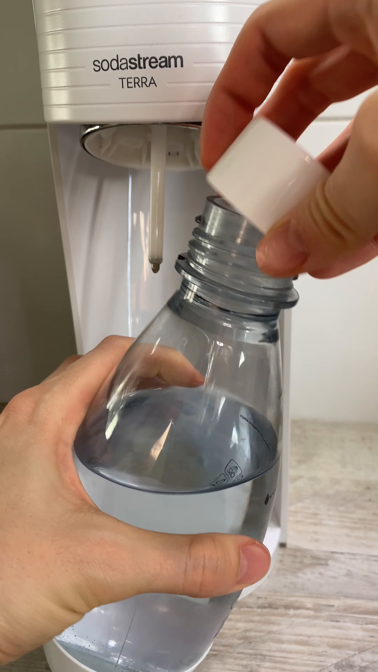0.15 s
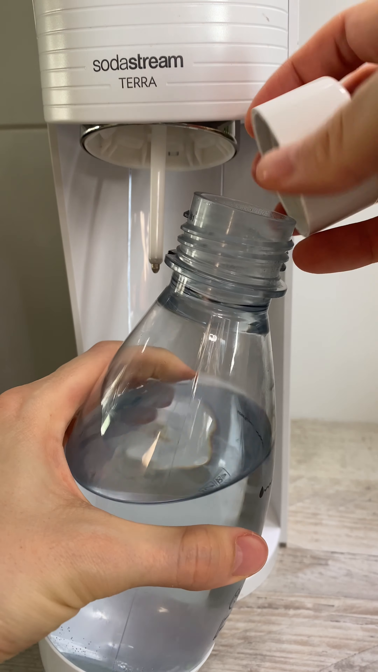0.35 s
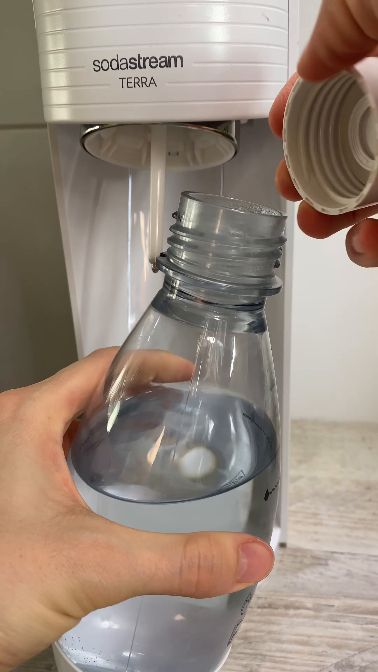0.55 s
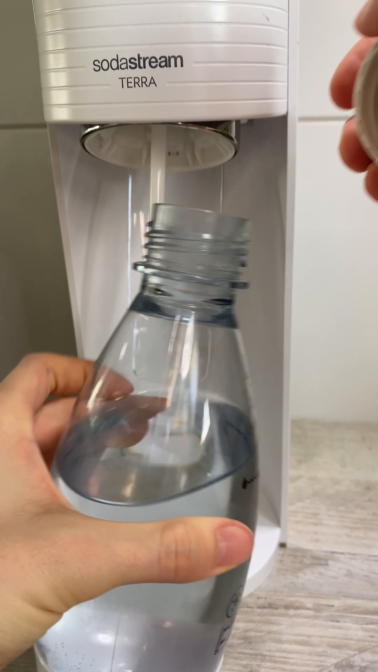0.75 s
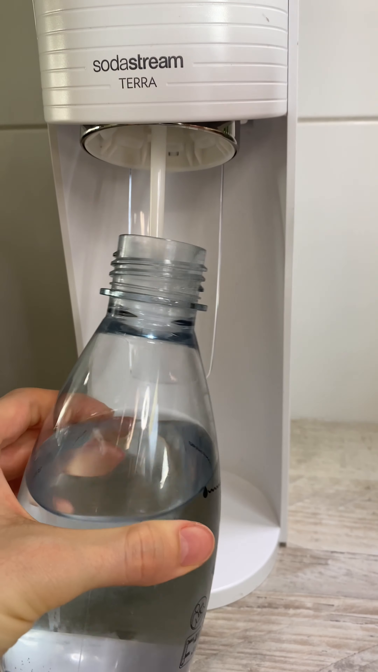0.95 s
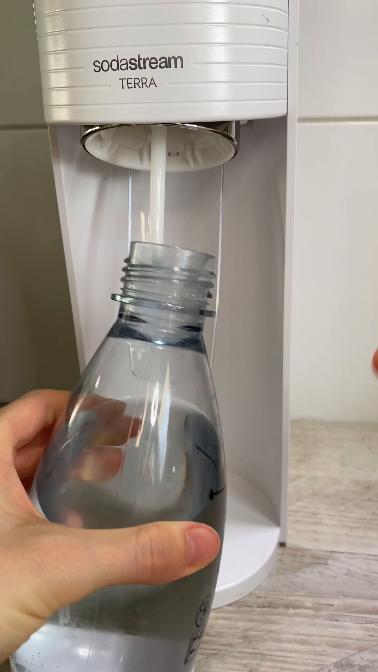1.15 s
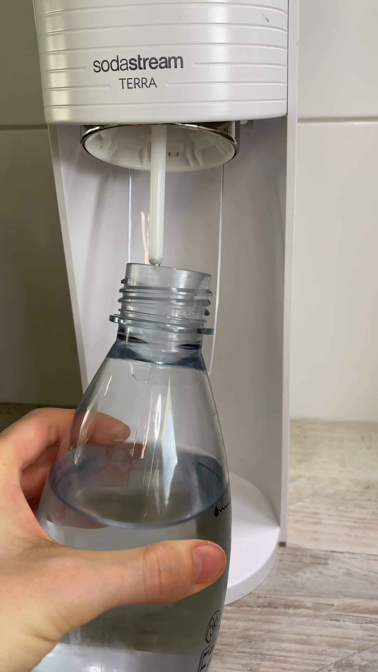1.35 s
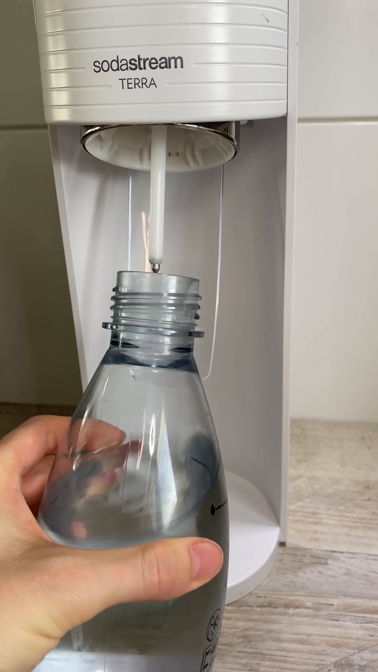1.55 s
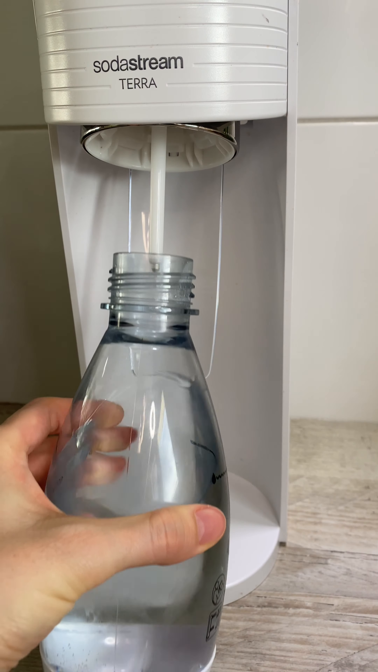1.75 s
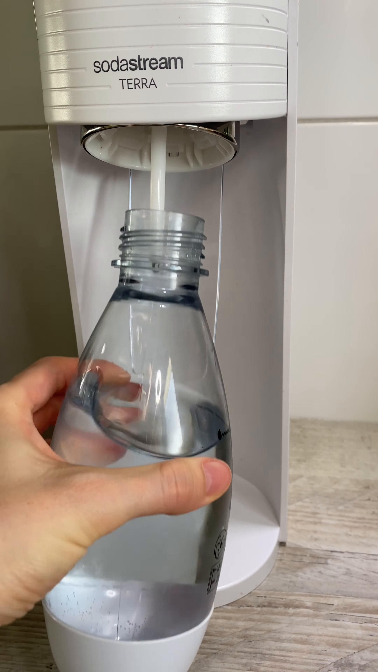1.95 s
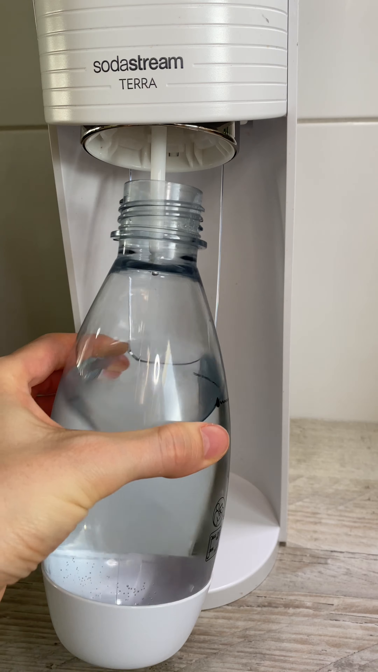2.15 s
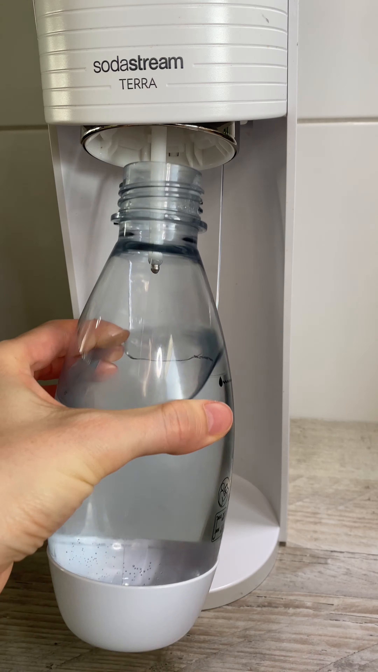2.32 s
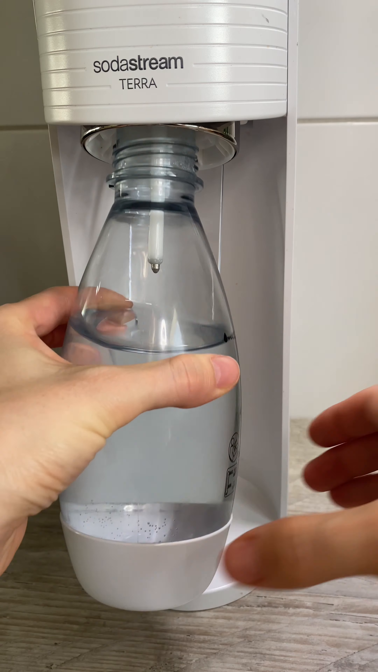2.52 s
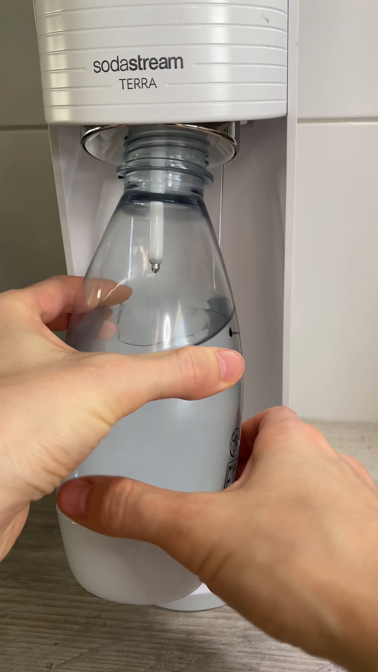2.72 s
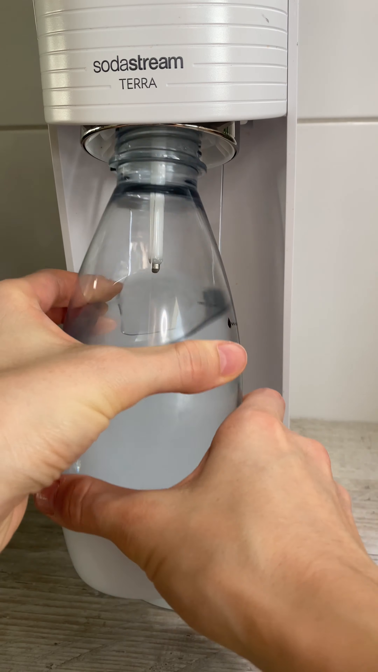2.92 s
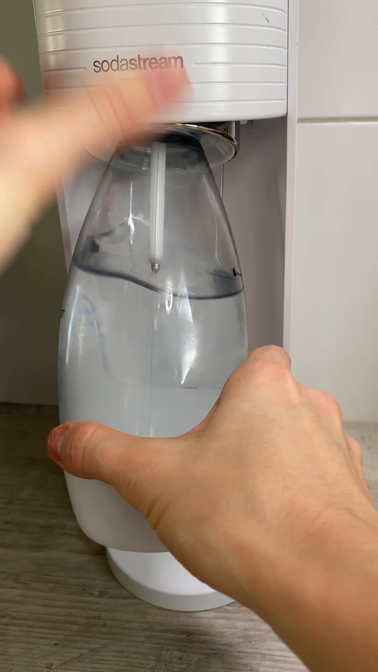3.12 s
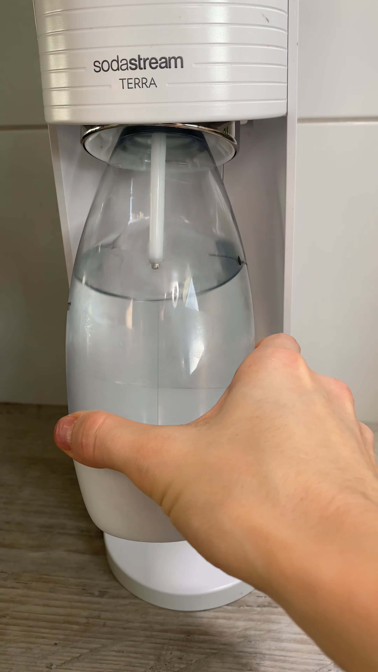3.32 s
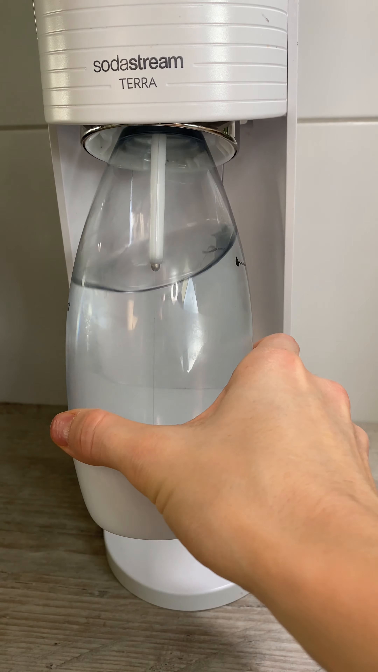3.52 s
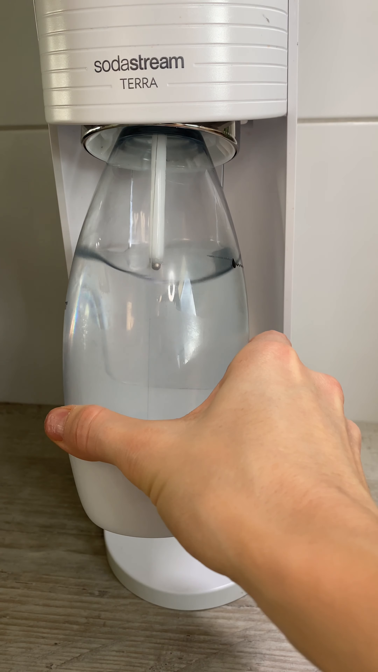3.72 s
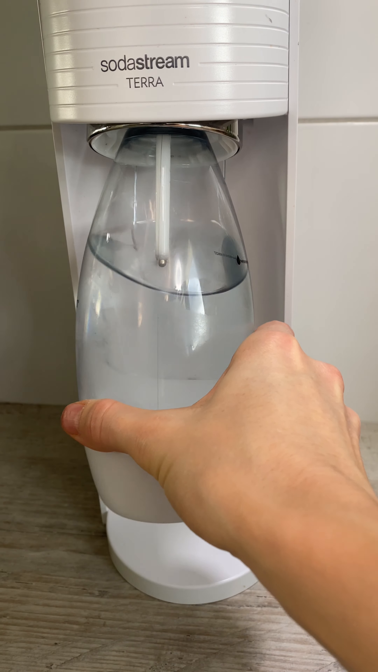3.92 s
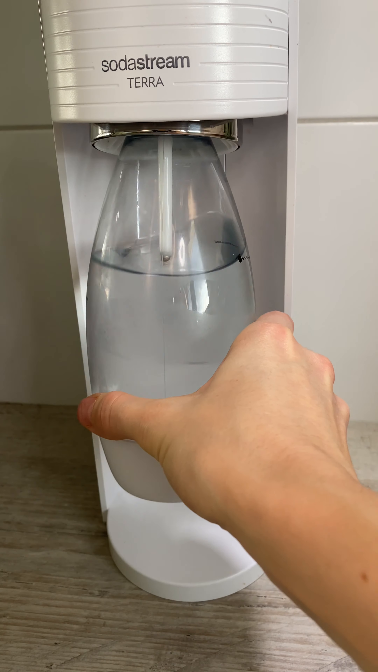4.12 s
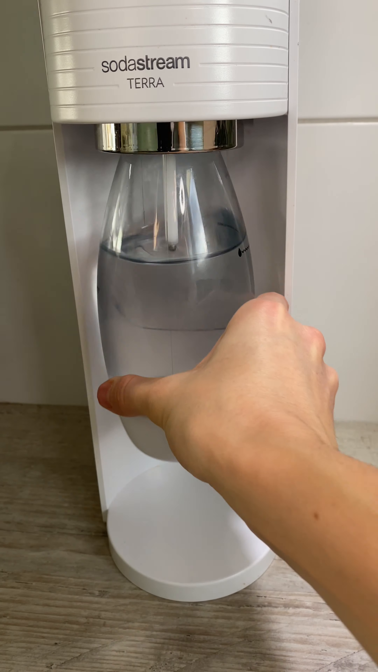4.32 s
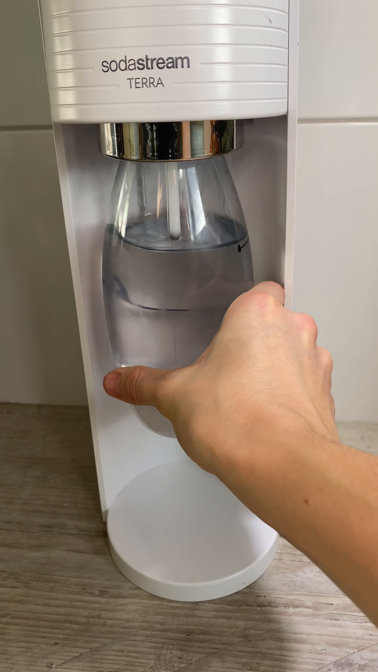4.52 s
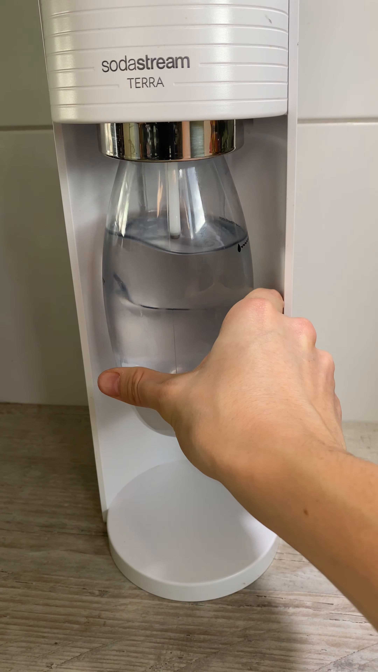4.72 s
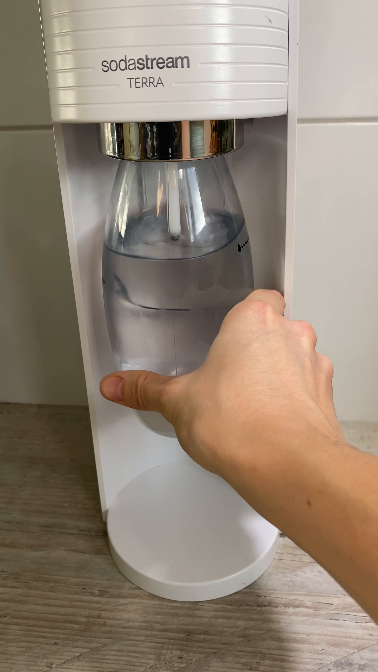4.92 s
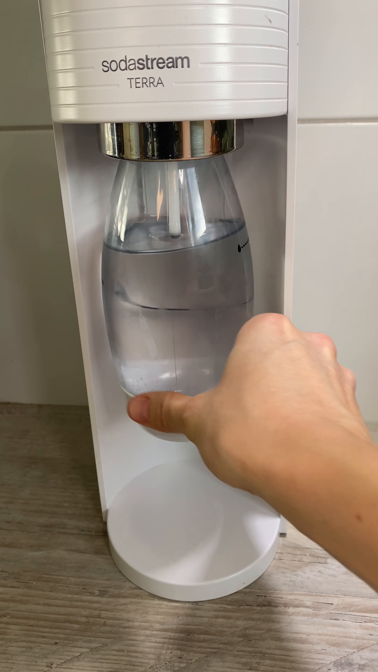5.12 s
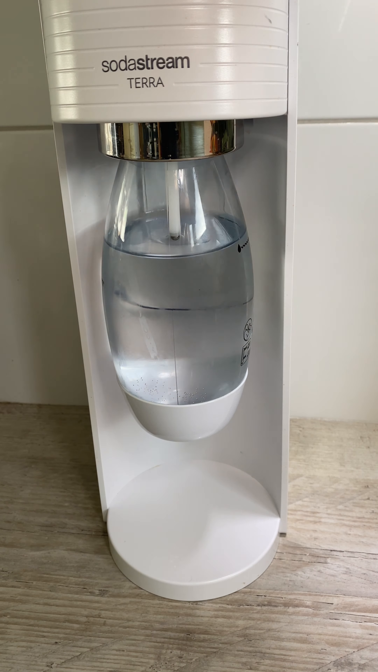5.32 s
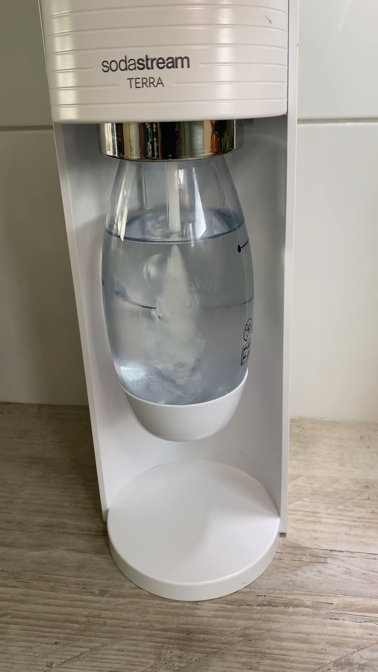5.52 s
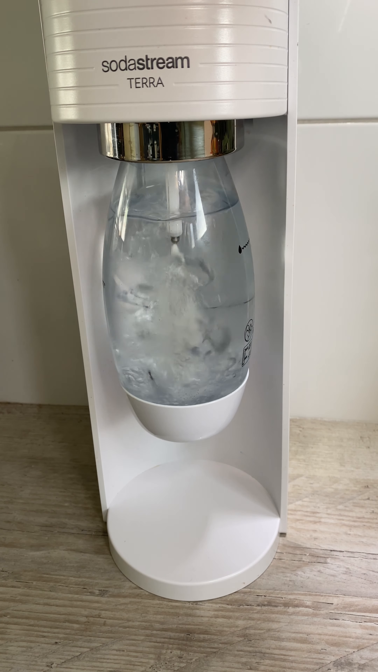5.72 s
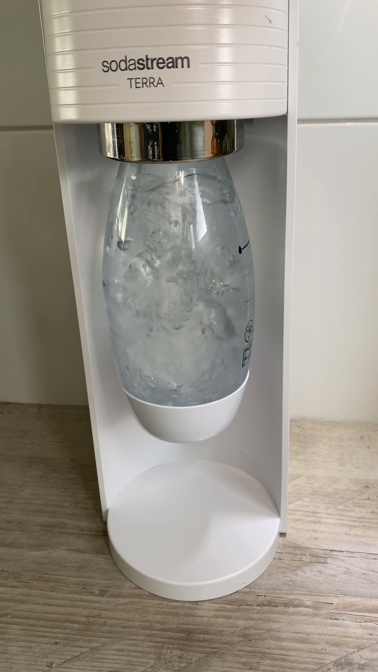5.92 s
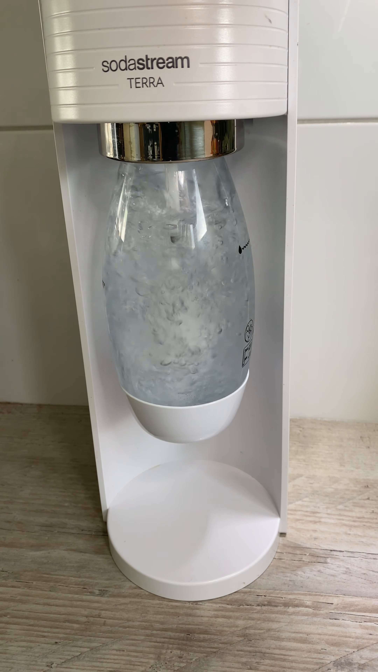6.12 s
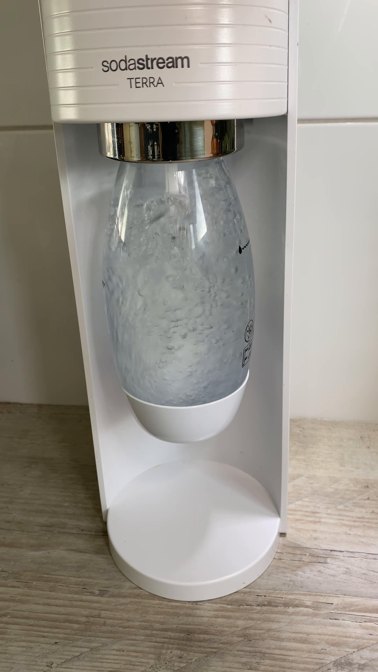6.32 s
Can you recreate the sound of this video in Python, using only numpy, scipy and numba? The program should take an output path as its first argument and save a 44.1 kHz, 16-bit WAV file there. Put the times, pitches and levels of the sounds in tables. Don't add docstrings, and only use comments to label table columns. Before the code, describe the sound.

Close kitchen handling of a plastic water bottle, with faint taps, hard knocks and clicks, ending in a sudden bubbling, hissing gas jet.

```python
import sys
import numpy as np
from scipy import signal
from scipy.fft import rfft, irfft, next_fast_len
from scipy.io import wavfile
from scipy.ndimage import uniform_filter1d
from numba import njit

SR = 44100
rng = np.random.default_rng(int(sys.argv[2]) if len(sys.argv) > 2 else 0)


def to_wav(s):
    ch = np.atleast_2d(s).T
    pcm = np.round(np.clip(ch, -1, 1) * 32767)
    wavfile.write(sys.argv[1], SR, pcm.astype(np.int16))


def invert_db(level):
    return 10 ** (np.asarray(level, dtype=float) / 20)


N = 280476

# (frequency [Hz], density [dB per Hz])
HUM = [(20, -7.5), (45, -2.5), (80, 4), (140, -4), (256, -2.5), (400, -20), (540, -43), (1200, -72.5)]
# (frequency [Hz], density [dB per Hz])
HISS = [(500, 5), (1500, -8.5), (4000, -7.5), (7000, -9.5), (9500, -38), (13500, 1), (14500, -30)]
# (frequency [Hz], width [Hz], level [dB])
WHINE = [(9790, 90, 0), (10630, 90, -3), (10980, 90, -5), (13200, 90, 1), (13738, 60, 4)]
STIR_DB, STIR_RISE_S, STIR_FADE_S = -66, 0.12, 0.077
HAND_STIR_DB, HAND_STIR_SHARE = -29, 0.42

# (start [s], hold [s], level [dB], body rumble over it [dB])
RUBS = [(1.03, 0.031, -72.5, 14.5), (1.173, 0.14, -70.5, 5.5), (5.357, 0.056, -75.5, 8),
        (3.556, 0.05, -70.5, 5), (1.073, 0.093, -75, 2.5), (1.49, 0.01, -70.5, -1), (2.438, 0.077, -88, 26),
        (3.507, 0.049, -86.5, 14), (3.679, 0.24, -67.5, 12), (3.841, 0.13, -59.5, 8), (3.988, 0.17, -69, 8),
        (5.303, 0.079, -94.5, 28.5), (2.035, 0.096, -57, 5.5), (2.982, 0.087, -56, -1),
        (3.269, 0.063, -64, 15.5), (4.204, 0.057, -68.5, 19.5), (4.332, 0.13, -62, -5.5),
        (4.574, 0.058, -81, 15), (4.963, 0.035, -69, 8), (4.994, 0.062, -69.5, 15)]
# (start [s], hold [s], level [dB])
CAP_TURN = (0.0, 0.29, -69.5)
# (frequency [Hz], width [Hz], level [dB])
THREAD = [(834, 100, -39), (1870, 300, 0.5), (2610, 220, 2), (3180, 660, -7), (4370, 260, -5),
          (5840, 300, -6)]
# (frequency [Hz], width [Hz], level [dB])
GRIP = [(280, 120, 0), (480, 200, -2), (800, 400, -4)]
# (frequency [Hz], level [dB])
RUSTLE = [(10500, -40), (12300, 0), (15500, 0), (16500, -25)]
RUB_RISE_DB_S, RUB_FADE_DB_S = 607.5, 316

# (time [s], peak [dB], pitch [Hz])
THUDS = [(1.189, -55.5, 234.5), (1.279, -59, 275), (4.08, -45.5, 94.1), (1.521, -54.5, 166.4),
         (1.569, -57, 165.4), (2.468, -42, 223.6), (2.518, -55.5, 218.2), (2.966, -12, 320.4),
         (3.021, -35, 181), (3.261, -10, 308.2), (3.31, -24, 153), (3.565, -32.5, 282),
         (3.776, -30.5, 294.4), (3.878, -33.5, 500), (3.919, -38.5, 487), (3.984, -36, 265.6),
         (4.025, -39, 326), (4.29, -21.5, 250.7), (4.307, -9, 365), (4.334, -22, 280.6), (4.363, -44, 235),
         (4.451, -35.5, 244), (4.553, -41.5, 246), (4.986, -34.5, 328), (5.283, -57, 267),
         (5.436, -34.5, 295.6), (5.473, -24.5, 276.4)]
# (time [s], peak [dB], pitch [Hz], ring [s])
SWELLS = [
    (3.552, -17.5, 276.3, 0.091),
    (5.47, -22, 269.2, 0.26),
    (5.69, -32.5, 115.6, 0.28),
    (5.74, -27, 77, 0.27),
    (5.83, -27, 70, 0.16),
    (5.92, -22.5, 87.5, .3),
    (5.97, -18, 92.1, 0.17),
    (6.09, -28, 85.8, 0.22),
]
# (time [s], peak [dB], pitch [Hz], ring [s])
SQUEAK = (0.14, -43, 400, .28)
HARD_RING_S, RING_DOUBLES_DB = 0.028, 20
SWELL_RISE_S, SWELL_GLIDE = 0.043, .2
SQUEAK_RISE_S, SQUEAK_GLIDE = .08, .45

# (time [s], crack peak [dB], crack pitch [Hz], shell ring [dB], shell pitch [Hz])
CAP = [
    (0.0199, -52, 2342, -54.5, 834),
    (0.0567, -52, 4370, -91, 850),
    (0.1002, -54, 2700, -57, 834),
    (0.1696, -58, 2500, -59, 834),
    (0.2154, -56, 2560, -54, 830),
    (0.2483, -54, 2600, -48, 834),
    (0.4615, -62.5, 4100, -86, 1240),
    (0.6737, -64, 4370, -94, 630),
    (1.3683, -52, 4350, -84, 640),
    (1.497, -59, 1676, -53, 992),
]
# (time [s], crack peak [dB], crack pitch [Hz], shell ring [dB], shell pitch [Hz])
TAPS = [
    (1.0137, -40, 2300, -47, 680),
    (1.1857, -32.5, 2830, -36, 1018),
    (1.19, -58, 3000, -43, 693),
    (1.2352, -68, 2690, -36.5, 998),
    (1.276, -50, 2560, -49, 658),
]
# (time [s], crack peak [dB], crack pitch [Hz], shell ring [dB], shell pitch [Hz])
CLACKS = [
    (1.991, -7, 1415, -11, 1460),
    (1.9934, -28.5, 1550, -33, 1330),
    (2.0178, -12.5, 1310, -26, 1220),
    (2.021, -20.5, 1510, -32.5, 1230),
    (2.0315, -20, 1740, -24.5, 970),
    (2.0441, -34, 1380, -32.5, 1370),
    (2.1194, -40.5, 1450, -27.5, 773),
    (2.1336, -35.5, 1620, -37, 576),
]
# (time [s], crack peak [dB], crack pitch [Hz], shell
# ring [dB], shell pitch [Hz])
KNOCKS = [(2.4566, -45.5, 1564, -38.5, 665), (2.9624, -17.5, 2860, -20.5, 612.4),
          (3.0196, -68, 2680, -30, 678), (3.0898, -30.5, 3360, -46.5, 1274),
          (3.2554, -23.5, 1884, -24, 697), (3.6653, -42.5, 1600, -47.5, 863), (4.4539, -62, 1514, -30, 862),
          (4.5523, -43.5, 1270, -43, 663), (4.576, -46, 1970, -44, 702), (5.0405, -45, 1630, -42.5, 655),
          (5.5727, -22.5, 4370, -18, 1234), (5.7862, -24, 3640, -24, 627)]
# (time [s], crack peak [dB], crack pitch [Hz], shell ring [dB], shell pitch [Hz])
CLICKS = [(2.5405, -58, 1540, -55.5, 891), (2.9728, -29.5, 2424, -33, 586),
          (3.8755, -31, 1360, -27.5, 1342), (3.9214, -49, 1920, -40.5, 693),
          (4.0248, -43, 1770, -43.5, 898), (4.2745, -32.5, 4540, -54, 660), (4.4233, -48, 3280, -47, 673),
          (4.9386, -45, 1950, -50, 716), (4.97, -55, 4500, -62, 802), (4.9847, -34.5, 1780, -37, 962),
          (5.3453, -56.5, 1420, -49.5, 702), (5.431, -25.5, 3180, -28.5, 873),
          (5.4431, -29, 1680, -30, 932), (5.6007, -12.5, 4640, -26, 1313),
          (6.063, -27.5, 4890, -18.5, 1036)]
# (time [s], crack peak [dB], crack pitch [Hz], shell ring [dB], shell pitch [Hz])
TICKS = [(2.4004, -60, 3650, -59.5, 906.6), (3.5493, -49.5, 2730, -42.5, 665),
         (3.5683, -53, 1520, -50.5, 656), (3.5889, -49, 1560, -65, 677), (3.6257, -55, 1680, -70, 590),
         (3.699, -32.5, 4330, -58, 670), (3.7773, -24.5, 2310, -34, 889), (3.5405, -71, 1300, -48.5, 797),
         (4.1949, -59.5, 1360, -48.5, 822), (4.2195, -40, 5070, -48, 793), (4.2833, -27.5, 1610, -35, 938),
         (4.2928, -29, 1390, -25, 686), (4.3036, -21, 4690, -18.5, 858), (4.801, -63.5, 6940, -77, 880),
         (3.859, -64, 6130, -73, 864)]
# (time [s], peak [dB], pitch [Hz], ring [s])
PINGS = [(2.044, -22.5, 580, 0.012), (1.993, -32.5, 2600, 0.056), (4.298, -31, 3000, 0.12),
         (1.016, -44.5, 1030, 0.05), (2.978, -28.5, 1080, 0.12), (3.922, -40, 882, .04),
         (3.9, -47, 1200, .08), (4.988, -29.5, 654, 0.039), (2.0175, -11, 1350, 0.009),
         (1.991, -38, 11000, .05), (2.018, -41.5, 13300, .1), (3.091, -30.5, 3100, 0.013),
         (1.995, -32.5, 300, 0.045), (2.0185, -23, 2500, .01), (4.6, -42.5, 410, .08)]
# (time [s], peak [dB], pitch [Hz], ring [s])
BUZZES = [(1.998, -37, 1600, .28), (2.0, -46.5, 4300, .3), (2.04, -44, 2900, .1), (1.499, -52, 1550, .05),
          (1.5, -59, 2600, 0.052), (4.113, -42.5, 2380, 0.025), (3.091, -30.5, 2480, .022),
          (3.09, -33.5, 3800, .02), (1.02, -52, 2700, 0.032), (1.187, -41, 3050, 0.04),
          (1.28, -53, 2900, .04), (1.022, -52, 1650, .05)]
CLUSTER = [.943, .976, 1., 1.019, 1.048]
# (time [s], peak [dB], pitch [Hz], ring [s])
HOLLOWS = [(1.018, -36.5, 686, 0.13), (1.105, -54, 960, 0.042), (1.165, -46, 1007, 0.062),
           (1.238, -38, 1001, 0.087), (1.28, -46, 654, .14), (1.47, -57.5, 658, .12),
           (1.505, -50.5, 996, 0.044), (1.5, -56, 3720, 0.045), (1.993, -31.5, 452, .06),
           (2.01, -46, 95, 0.31), (2.966, -18, 321, .11), (3.261, -17.5, 309, 0.093),
           (3.268, -26, 190, .25), (2.172, -41, 610, .04), (3.695, -35, 3950, .03),
           (3.96, -44.5, 1540, 0.046), (3.1, -44, 2443, .22), (4.12, -60, 2380, .1),
           (4.25, -39, 1420, 0.055), (4.548, -38.5, 1147, 0.041), (4.865, -63, 802, 0.063),
           (4.985, -29.5, 1773, 0.035), (5.04, -35.5, 450, .05), (5.08, -59, 660, 0.32),
           (5.31, -47, 300, .06), (0.01, -57.5, 448, 0.075), (4.308, -19, 404, .04)]
HOLLOW_RISE_S = 0.0058
# (frequency [Hz], level [dB], ring [s])
TUBE = [(1740, -8, .02), (2560, -6, .02), (3030, -2, .025), (3270, -4, .02), (4960, -5, .02)]
# (frequency [Hz], level [dB])
NECK = [(900, -22), (1700, -2), (2200, -12), (2900, 0), (3800, -12), (4400, -3), (5000, -4), (10000, -40)]
# (frequency [Hz], level [dB])
LID = [(150, -27.5), (900, 2.5), (1500, -5), (2300, 3), (3000, 7), (3700, -5), (4350, -9.5), (11000, -42)]
# (frequency [Hz], level [dB])
CRACK = [(300, -11.5), (900, 6.5), (1500, 8), (3000, 7.5), (5000, -0.5), (7000, -2), (10000, -32)]
# (frequency [Hz], level [dB])
TOP_END = [(4500, -7.5), (6500, -1.5), (8000, -4), (11000, -4.5), (13500, -5), (16500, -15)]

# (time [s], level [dB])
JET = [
    (5.425, -51.5),
    (5.44, -40.5),
    (5.482, -45),
    (5.518, -38.5),
    (5.6, -39),
    (5.67, -34.5),
    (5.9, -33),
    (6.1, -33.5),
    (6.36, -34),
]
# (time [s], depth [dB], width [s])
LULLS = [
    (5.64, 1, .02),
    (5.775, 5, .008),
    (5.91, 6.5, .008),
    (6.027, 7, .008),
    (6.11, 2, 0.0092),
]
# (time [s], peak [dB], pitch [Hz])
GULPS = [(5.526, -16, 1025), (5.572, -34.5, 1215), (5.599, -17, 1286), (5.617, -9, 1445),
         (5.653, -14, 2367), (5.678, -14, 1076), (5.718, -16.5, 2120), (5.757, -13.5, 780),
         (5.785, -20, 587), (5.816, -19, 745), (5.858, -11, 1115), (5.879, -7.5, 975), (5.924, -13, 674),
         (5.942, -6.5, 680), (6.041, -8.5, 698), (6.065, -18.5, 4875), (6.083, -13.5, 652),
         (6.231, -25.5, 670), (6.339, -10.5, 1756), (5.788, -24.5, 3770), (5.881, -22.5, 2960),
         (5.902, -9, 1610), (5.97, -15, 706), (5.999, -24, 2380), (6.02, -21.5, 3940), (6.16, -29, 693),
         (6.2, -15, 2336), (6.25, -10.5, 3120), (6.261, -23, 5310), (6.29, -29, 1094), (6.315, -12.5, 3910)]
# (frequency [Hz], width [Hz], level [dB])
BOTTLE = [(255, 90, -9), (379, 82, -6), (675, 50, 9.5), (1069, 347, 9), (1380, 520, 4.5), (1610, 50, 18.5),
          (1750, 466, 11), (2357, 74, 18), (2500, 900, 1.5), (2860, 70, 6.5), (3430, 63, 0), (3950, 88, 5)]
# (frequency [Hz], width [Hz], level [dB])
CHURN = [(80.2, 150, -4.5), (113.6, 20.17, 4.5), (182, 11, -7)]
# (frequency [Hz], width [Hz], level [dB])
NOZZLE = [(7500, 800, -1), (10900, 250, -8), (11840, 90, 10)]
# (frequency [Hz], level [dB])
JET_AIR = [(4000, 2), (6000, -1), (8000, -3), (11500, -5), (12700, -5), (14200, 1.5)]
# (frequency [Hz], level [dB])
FROTH = [(1500, -21.5), (2600, 1), (3800, 0), (5300, -4.5), (6500, -31), (9000, -51)]
FIZZ_DB, FIZZ_CLIMBS_DB_S = -10, 30
CHURN_DB, CHURN_PEAK_S, CHURN_FALLS_DB_S = -37.5, 5.93, 39
NOZZLE_DB, SPURT_DB, SPURT_S = -3, 16, 0.09
GULP_RING_S, GULP_DOUBLES_DB = 0.019, 19
SURGE_DB, PATCH_DB = 1.0, 2.2

# (frequency [Hz], decay [s], share unlike at the two ports [0-1])
ROOM = [(62.3, 0.34, 0), (173.3, 0.6, 0.09), (408, 0.41, 0.5), (1027, 0.24, 0.6), (2860, .24, 0.08),
        (5070, 0.14, 0.4), (8240, 0.068, 0.99), (13500, 0.044, 1)]
# (frequency [Hz], level [dB])
SCATTER = [(300, -22), (700, -12), (1400, -16), (2500, -2), (4500, 0), (8000, -10), (14000, -4)]
SCATTER_DB, SCATTER_S = -10, .02
TILE_S, TILE_DB = 0.0037, -16

# (frequency [Hz], phase [rad])
PORT_LAG = [(0, 0), (1500, 0), (3000, 1.0), (4000, .9), (5200, 1.6), (8300, 2.85), (11800, 3.3),
            (16100, 6.3)]
# (frequency [Hz], level [dB])
PORT_DB = [(60, -.1), (200, -.5), (380, -1), (700, -3), (1290, 0), (2380, -2.5), (4400, -2.5), (8120, 0)]
# (frequency [Hz], level [dB])
MIC = [(25, -16), (70, 5), (12500, -4), (14000, -11), (15600, -12), (15900, -28)]
# (from [Hz], to [Hz], limit [dB])
MID_GAPS = [(6400, 7300, -31), (7700, 8300, -30), (8300, 11600, -12), (12200, 15700, -33.5),
            (15700, 17000, -22)]
GAP_SWAY_DB, JUMP_DB, JUMP_KEEPS_DB = 4, 8, -39


def level(x, db):
    return x * invert_db(db) / np.sqrt(np.mean(x ** 2))


def over_hz(table, size):
    hz, value = np.transpose(table)
    bin_hz = np.arange(size // 2 + 1) * SR / size
    return np.interp(np.log(bin_hz + 1), np.log(hz + 1), value)


def tint(x, table):
    return irfft(rfft(x) * invert_db(over_hz(table, len(x))), len(x))


def noise(table, size=N):
    return level(tint(rng.standard_normal(size), table), 0)


def around(hz):
    return noise([(hz / 5, -50), (hz / 2, -18), (hz, 0), (hz * 2, -18), (hz * 5, -55)], size=4096)


def resonate(x, modes):
    out = 0
    for k, (hz, width_hz, db) in enumerate(modes):
        mode = signal.lfilter(*signal.iirpeak(hz, hz / width_hz, SR), x)
        out = out + (-1) ** k * invert_db(db) * mode
    return level(out, 0)


def curve(table, silent_db=-110):
    s, *columns = np.transpose(table)
    t = np.arange(N) / SR
    return [np.interp(t, s, c, left=silent_db, right=silent_db) for c in columns]


def walk(rate_hz):
    k = int(SR / rate_hz)
    held = np.repeat(rng.standard_normal(N // k + 1), k)
    return 1.3 * uniform_filter1d(uniform_filter1d(held, k), k)[:N]


@njit
def rings(s, hz, t60, size, push_s, glide):
    out = np.zeros(N)
    for k in range(len(s)):
        start, phase = int(s[k] * SR), 0.
        for i in range(min(int(t60[k] * SR), N - start)):
            t = i / SR
            phase += 2 * np.pi * hz[k] * (1 + glide * t / t60[k]) / SR
            swell = 1 - np.exp(-t / push_s)
            out[start + i] += size[k] * np.exp(-6.9 * t / t60[k]) * swell * np.sin(phase)
    return out


def background():
    hum = noise(HUM) * invert_db(walk(5)) + .05 * np.array([noise(HUM), noise(HUM)])
    whine = resonate(rng.standard_normal(N), WHINE)
    hiss = np.array([noise(HISS), noise(HISS)])
    power = np.full(N + SR, invert_db(2 * STIR_DB))
    t = np.arange(SR) / SR
    swell = (1 - np.exp(-t / STIR_RISE_S)) * np.exp(-t / STIR_FADE_S)
    for s, db, _ in THUDS:
        at = int(s * SR)
        power[at:at + SR] += (invert_db(HAND_STIR_DB + HAND_STIR_SHARE * db) * swell) ** 2
    return np.sqrt(power[:N]) * hum + level(whine, -76.5) + level(hiss, -76.0)


def slide(start_s, hold_s, db):
    t = np.arange(N) / SR
    early_s = np.maximum(start_s - t, 0)
    late_s = np.maximum(t - start_s - hold_s, 0)
    return db - RUB_RISE_DB_S * early_s - RUB_FADE_DB_S * late_s


def rubbing():
    slips = rng.standard_normal(N) * invert_db(2.5 * walk(60) + 2.5 * walk(400))
    surface = level(tint(slips, CRACK), 0) + level(noise(TOP_END), -3.0)
    surface = surface + level(tint(slips, RUSTLE), -5.5)
    body = resonate(slips, GRIP)
    out = invert_db(slide(*CAP_TURN)) * (resonate(slips, THREAD) + invert_db(-4.0) * surface)
    for start_s, hold_s, db, body_db in RUBS:
        out = out + invert_db(slide(start_s, hold_s, db)) * (surface + invert_db(body_db) * body)
    return out


def thuds():
    s, db, hz = np.transpose(THUDS)
    t60 = HARD_RING_S * 2 ** (-db / RING_DOUBLES_DB)
    blow = rings(s, hz, t60, invert_db(db + 5.5), 0.0064, 0.)
    blow = blow + rings(s, 1.278 * hz, 0.38 * t60, invert_db(db + 4.5), 0.0013, 0.)
    blow = blow + rings(s, 0.82 * hz, 3.28 * t60, invert_db(db - 7.0), 0.02, 0.)
    push = rings(s, 0.31 * hz, 0 * s + 0.022, invert_db(db), 0.0045, 0.)
    shake = invert_db(-17.0) * np.std(blow) * resonate(push, CHURN)
    s, db, hz, t60 = np.transpose(SWELLS)
    swells = rings(s, hz, t60, invert_db(db), SWELL_RISE_S, SWELL_GLIDE)
    s, db, hz, t60 = np.transpose([SQUEAK])
    squeak = rings(s, hz, t60, invert_db(db), SQUEAK_RISE_S, SQUEAK_GLIDE)
    return swells + squeak + blow + shake


def contacts(table, colour, rattle_s, ring_s, tone_db, top_db, tail=.23):
    s, crack_db, crack_hz, shell_db, shell_hz = np.transpose(table)
    out = np.zeros(N + 4096)
    t = (np.arange(4096) - 512) / SR
    after = np.maximum(t, 0)
    scuff = invert_db(-19.0) * np.exp(np.minimum(t, 0) / 0.0044) * np.exp(-after / 0.014)
    rattle = (1 - np.exp(-after / (.2 * rattle_s))) * np.exp(-(t / rattle_s) ** 2)
    rattle = rattle + scuff + tail * (1 - np.exp(-after / 0.0066)) * np.exp(-after / 0.019)
    top_fade = 0.46 + np.exp(-after / 0.0033)
    ring_s = ring_s * (680 / shell_hz) ** 2
    for k, at in enumerate((s * SR).astype(int)):
        crack = invert_db(-10.5) * noise(colour, size=4096) + invert_db(-5.5) * around(crack_hz[k])
        top = invert_db(top_db + 3.5) * noise(TOP_END, size=4096) * top_fade
        swell = (1 - np.exp(-after / .003)) * np.exp(-np.log(1000) * after / ring_s[k])
        wall = invert_db(shell_db[k] - tone_db - 2.5) * around(shell_hz[k]) * swell
        out[at:at + 4096] += invert_db(crack_db[k]) * (crack + top) * rattle + wall
    return out[512:N + 512] + rings(s, shell_hz, ring_s, invert_db(shell_db + tone_db), .004, 0.)


def tube():
    s, db = np.transpose(TAPS)[:2]
    out = 0
    for hz, mode_db, t60 in TUBE:
        size = invert_db(db + mode_db + 2 * rng.standard_normal(len(s)))
        out = out + rings(s, hz + 0. * s, t60 + 0 * s, size, .0007, 0.)
    return out


def small_parts():
    s, db, hz, t60 = np.transpose(BUZZES)
    out = sum(rings(s, share * hz, t60, invert_db(db), .003, 0.) for share in CLUSTER)
    s, db, hz, t60 = np.transpose(HOLLOWS)
    out = out + rings(s, hz, t60, invert_db(db), HOLLOW_RISE_S, 0.)
    s, db, hz, t60 = np.transpose(PINGS)
    return out + rings(s, hz, np.clip(t60, .008, .4), invert_db(db - 1.5), 0.00058, 0.)


def ticks():
    out = contacts(CAP, NECK, 0.0054, 0.055, tone_db=5, top_db=-11.5)
    out = out + contacts(TAPS, NECK, .005, .09, tone_db=4, top_db=-38)
    out = out + contacts(CLACKS, LID, 0.0025, 0.04, tone_db=-2.0, top_db=-19.5, tail=0.12)
    out = out + contacts(KNOCKS, CRACK, 0.0044, 0.063, tone_db=1.0, top_db=-20.0)
    out = out + contacts(CLICKS, CRACK, 0.0032, 0.14, tone_db=2.0, top_db=-2.0)
    out = out + contacts(TICKS, CRACK, 0.0043, 0.091, tone_db=6.0, top_db=2.0)
    return out + tube() + small_parts()


def bubbles(count, low_hz, octaves, late_octaves, cycles):
    when, pitch, loudness, rarity = rng.random((count, 4)).T
    s = JET[0][0] + when * (N / SR - JET[0][0])
    reach = octaves + (late_octaves - octaves) * when
    hz = low_hz * 2 ** (reach * (pitch + rarity ** 2) / 2)
    cloud = rings(s, hz, cycles / hz, invert_db(-3.4 * np.log(loudness + .01)), .003, .03)
    return cloud / np.std(cloud[int(JET[0][0] * SR):])


def patchy(x, surge):
    spec = rfft(x)
    hz = np.arange(N // 2 + 1) * SR / N
    step = np.clip(2 * np.log2(hz / 400 + 1e-9), 0, 8)
    out = 0
    for k in range(9):
        band = irfft(spec * np.maximum(1 - np.abs(step - k), 0), N)
        out = out + band * invert_db(PATCH_DB * np.roll(surge, (k + 1) * N // 11) - .5)
    return out


def gulps():
    s, db, hz = np.transpose(GULPS)
    t60 = GULP_RING_S * 2 ** (-db / GULP_DOUBLES_DB)
    return rings(s, hz, t60, invert_db(db - 1.0), 0.0032, 0.025)


def jet():
    cloud_db, = curve(JET)
    t = np.arange(N) / SR
    for s, depth_db, width_s in LULLS:
        cloud_db = cloud_db - depth_db * np.exp(-((t - s) / width_s) ** 2)
    since = np.maximum(t - JET[0][0], 0)
    fizz_db = cloud_db + FIZZ_DB + FIZZ_CLIMBS_DB_S * (since - .4)
    churn_db = np.minimum(cloud_db + 6.5, CHURN_DB - CHURN_FALLS_DB_S * np.abs(t - CHURN_PEAK_S))
    nozzle_db = cloud_db + NOZZLE_DB + SPURT_DB * np.exp(-since / SPURT_S)

    cloud = bubbles(count=2400, low_hz=201.6, octaves=4.2, late_octaves=4.6, cycles=49)
    cloud = cloud + invert_db(-11.0) * noise(CRACK) * (since > 0)
    fizz = bubbles(count=4200, low_hz=1980, octaves=1.67, late_octaves=2.39, cycles=48)
    fizz = fizz + invert_db(-7.0) * noise(FROTH)
    churn = resonate(rng.standard_normal(N), CHURN) * invert_db(1.9 * walk(5.1))
    settled = np.clip((t - 5.62) / 0.13, 0, 1)
    whistle = resonate(rng.standard_normal(N), NOZZLE) * invert_db(2.5 * walk(30) - 5) * settled
    nozzle = noise(JET_AIR) * invert_db(0.5 * walk(93)) + whistle

    surge = walk(18)
    share = np.sqrt(1 - JET[0][0] * SR / N)
    water = invert_db(cloud_db + 3.0 + SURGE_DB * surge) * share * resonate(cloud, BOTTLE)
    water = water + invert_db(fizz_db + 1.5 * surge) * fizz
    return patchy(water, surge) + invert_db(churn_db) * churn + invert_db(nozzle_db) * nozzle + gulps()


def off_tiles(x):
    late = np.pad(x, (int(TILE_S * SR), 0))[:N]
    echo = signal.lfilter(*signal.butter(1, [350, 5000], "bandpass", fs=SR), late)
    return invert_db(TILE_DB) * echo * np.array([[1], [-1]])


def scatter(x, size=2048):
    spray = noise(SCATTER, size=size) * np.exp(-np.arange(size) / SR / SCATTER_S)
    spray = invert_db(SCATTER_DB) * spray / np.abs(rfft(spray)).max() * 2
    return signal.fftconvolve(x, spray)[:N] * np.array([[1], [-1]])


def room(x, size=32768):
    t, tail = np.arange(size) / SR, 0
    for hz, t60, unlike in ROOM:
        octave = [(hz / 3, -24), (hz, 0), (hz * 3, -24)]
        mid, side = noise(octave, size=size), noise(octave, size=size)
        both = mid + unlike * side * np.array([[1], [-1]])
        tail = tail + both * np.sqrt(hz / 1000) * np.exp(-np.log(1000) * t / t60)
    tail = tail * (1 - np.exp(-(t / 0.00065) ** 2))
    tail = tail / np.sqrt(np.sum(tail[0] ** 2))
    return signal.fftconvolve(x[None], tail, axes=1)[:, :N]


def scene():
    handling = ticks() + thuds() + rubbing()
    gas = jet()
    direct = handling + gas
    echoes = room(invert_db(-9.5) * handling + invert_db(-13.5) * gas)
    return direct + off_tiles(direct) + echoes + background() + scatter(direct)


def thin_top(x):
    mid_side = np.array([x[0] + x[1], x[0] - x[1]]) / 2
    spec = signal.stft(mid_side, nperseg=1024, noverlap=768)[2]
    band = np.arange(spec.shape[1]) // 10
    power = np.add.reduceat(np.abs(spec) ** 2 + 1e-18, np.arange(0, len(band), 10), axis=1)
    loud_db = 10 * np.log10(power[:, 2:].sum((0, 1)))
    mid_db = uniform_filter1d(10 * np.log10(power[0]) - loud_db, size=3)
    sway = uniform_filter1d(rng.standard_normal(mid_db.shape), size=18)
    sway = uniform_filter1d(sway, size=2, axis=0) * 5.6
    hz = (np.arange(len(mid_db))[:, None] + .5) * 10 * SR / 1024
    keep = True
    for from_hz, to_hz, limit_db in MID_GAPS:
        audible = mid_db + GAP_SWAY_DB * sway > limit_db
        keep = keep & (audible | (hz < from_hz) | (hz > to_hz))
    jump = loud_db - np.roll(loud_db, 2) > JUMP_DB
    keep = keep | (jump & (mid_db > JUMP_KEEPS_DB))
    gated = np.array([spec[0] * keep[band], spec[1]])
    mid, side = signal.istft(gated, nperseg=1024, noverlap=768)[1][:, :N]
    return np.array([mid + side, mid - side])


def top_cut(x):
    return signal.sosfilt(signal.butter(12, 16510, fs=SR, output="sos"), x)


def record(dry):
    size = next_fast_len(N + 4096)
    half = invert_db(over_hz(PORT_DB, size) / 2) * np.exp(.5j * over_hz(PORT_LAG, size))
    spec = rfft(dry, size) * invert_db(over_hz(MIC, size))
    ports = irfft(spec * np.array([half, 1 / half]), size)[:, :N]
    rounded = np.tanh(1.205 * ports) / 1.358
    return top_cut(thin_top(rounded))


dry = scene()
out = record(dry)
to_wav(out)
```